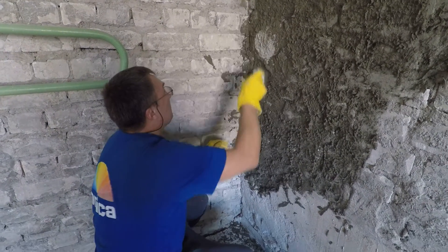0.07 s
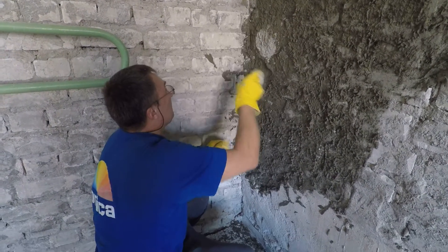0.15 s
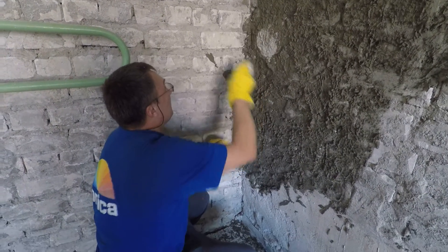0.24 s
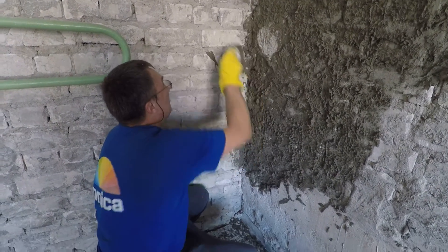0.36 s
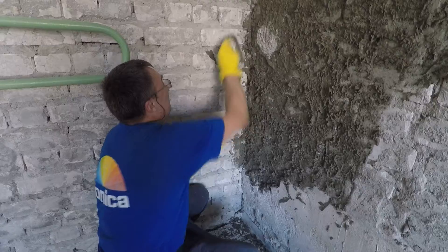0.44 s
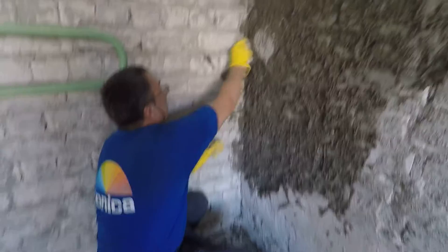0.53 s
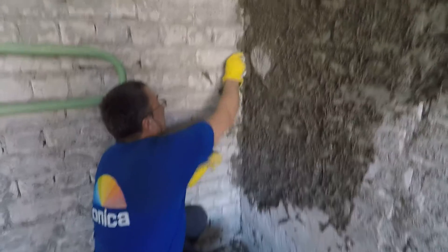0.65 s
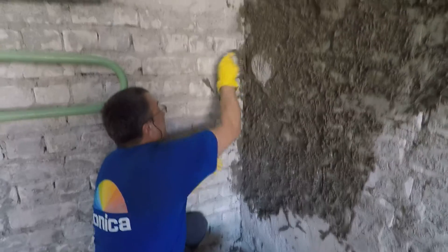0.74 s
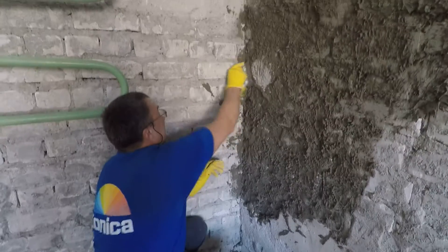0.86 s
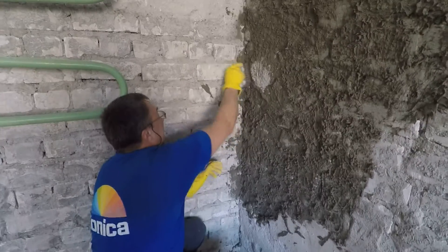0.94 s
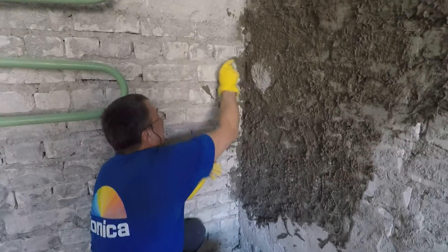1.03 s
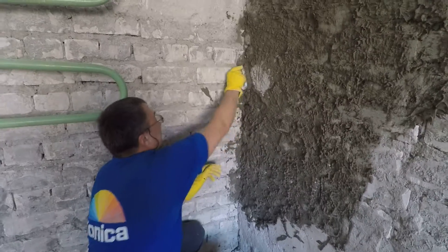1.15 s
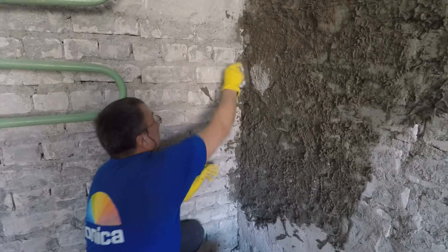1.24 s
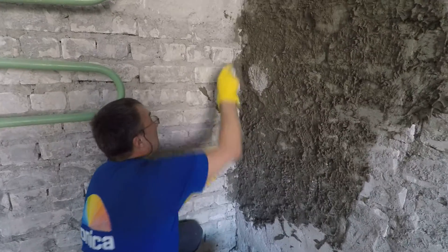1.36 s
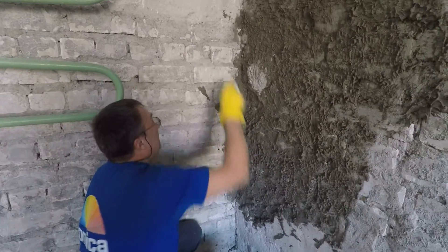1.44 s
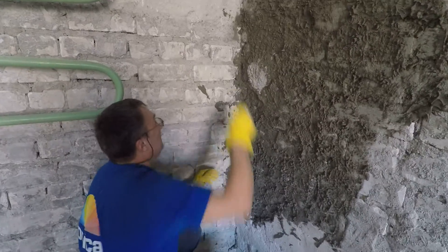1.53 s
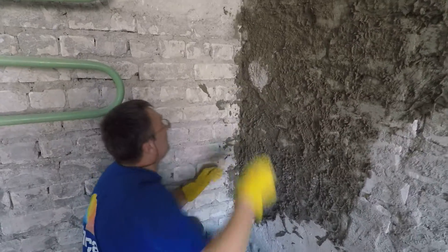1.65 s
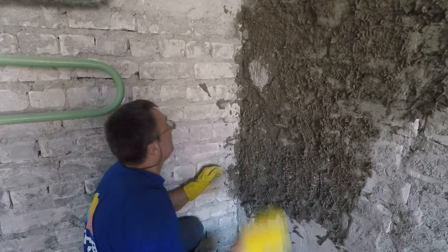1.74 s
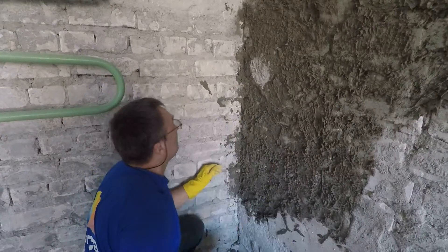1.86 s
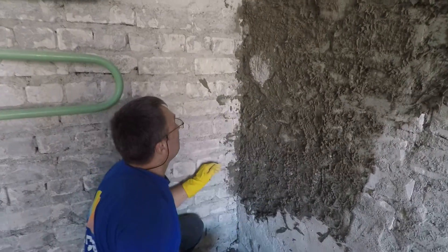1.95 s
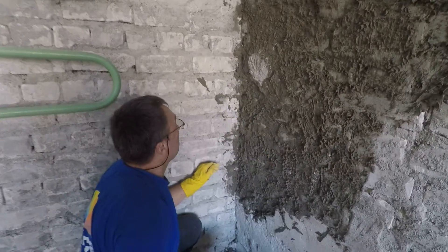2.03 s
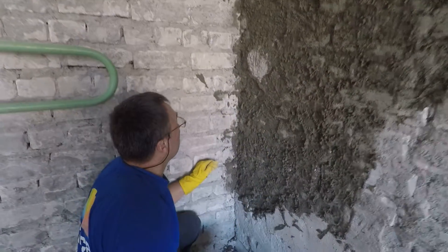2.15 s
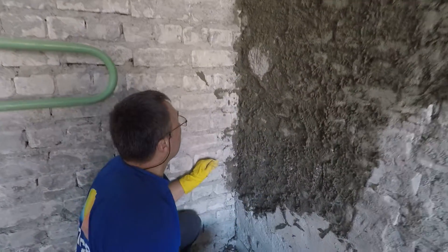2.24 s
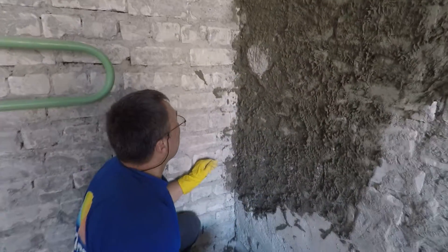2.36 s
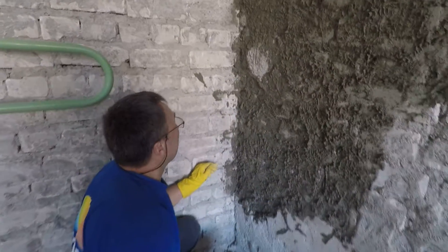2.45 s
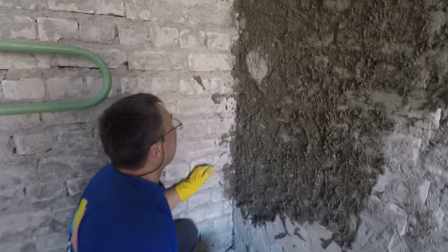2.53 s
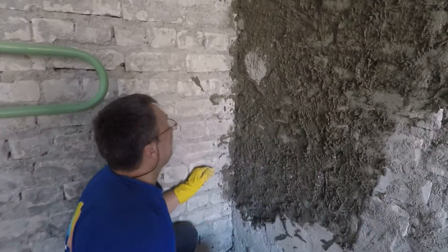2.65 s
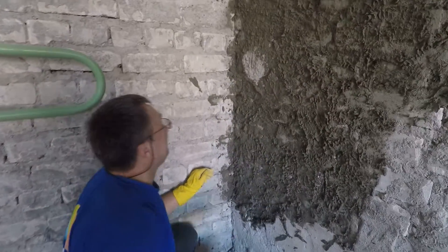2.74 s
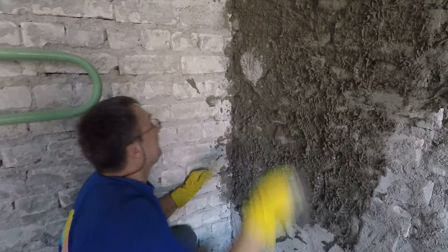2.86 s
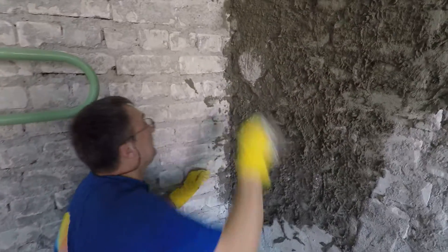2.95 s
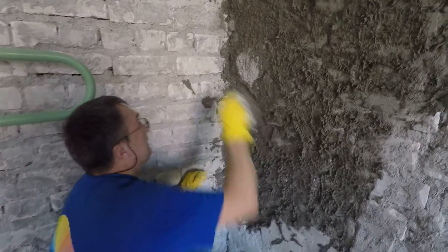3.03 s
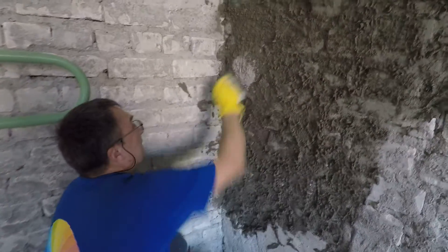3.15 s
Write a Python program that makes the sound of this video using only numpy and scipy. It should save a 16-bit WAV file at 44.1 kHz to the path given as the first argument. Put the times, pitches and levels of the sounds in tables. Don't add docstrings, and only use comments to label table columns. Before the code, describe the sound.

Three wet cement slaps on brick, the last hardest, echoing indoors over low mic rumble

```python
import sys
import numpy as np
from scipy import signal
from scipy.io import wavfile
from scipy.ndimage import uniform_filter1d

SR = 44100
rng = np.random.default_rng(int(sys.argv[2]) if len(sys.argv) > 2 else 0)


def makeup_ratio(level_db):
    decades = np.asarray(level_db, float) / 20
    return 10 ** decades


def log_audio(samples):
    frames = np.atleast_2d(samples).T
    limited = np.clip(frames, -1, 1)
    pcm = np.round(limited * 32767).astype(np.int16)
    wavfile.write(sys.argv[1], SR, pcm)


N = 141120
DIRECTIONS = 7


def evened(x):
    return x / np.sqrt(np.mean(x ** 2) + 1e-20)


def read(points, hz):
    f, value = np.transpose(points)
    return np.interp(np.log(hz + 1), np.log(f + 1), value)


def causal(points, size=2048):
    hz = abs(np.fft.fftfreq(size, 1 / SR))
    log_gain = np.log(makeup_ratio(read(points, hz)))
    spectrum = np.exp(np.conj(signal.hilbert(log_gain)))
    taps = np.fft.ifft(spectrum).real[:size // 2]
    return taps / np.linalg.norm(taps)


def resonate(x, hz, width_hz):
    return signal.lfilter(*signal.iirpeak(hz, hz / width_hz, SR), x)


def noise(points, size, patchy_db):
    top_hz = 15320
    frames, hz = 4 * N // size + 5, np.fft.rfftfreq(size, 1 / SR)
    a, b, patches = rng.standard_normal((frames, len(hz), 3)).T
    patches = uniform_filter1d(patches, size=10, axis=0)
    patches = evened(uniform_filter1d(patches, size=8, axis=1))
    gain = makeup_ratio(read(points, hz)[:, None] + patchy_db * patches)
    inside = (hz > points[0][0]) & (hz < top_hz)
    z = (a + 1j * b) * gain * inside[:, None]
    return evened(signal.istft(z, nperseg=size, noverlap=3 * size // 4)[1][:N])


def add(mix, s, sound):
    mix[:, round(s * SR):][:, :sound.shape[-1]] += sound


def rumble():
    # pitch in Hz, level in dB per Hz.
    air_colour = [(7.1, -19), (12, 5), (27, 10), (44, 3.5), (68, -4), (145, -29.5), (400, -36), (520, -43),
                  (880, -120)]
    # time in seconds, level in dB.
    gusts = [(0, -55.5), (.4, -52), (.45, -54.5), (.55, -43.5), (.7, -42), (.84, -45.5), (1.05, -42),
             (1.15, -49.5), (1.27, -43), (1.4, -46.5), (1.5, -49), (1.7, -47), (1.95, -52), (2.1, -45.5),
             (2.35, -48.5), (2.45, -40), (2.6, -48.5), (3.2, -50.5)]
    # pitch in Hz, level in dB per Hz.
    flutter_colour = [(50, -11.5), (90, 2), (150, -9), (350, -21.5)]
    lump_s, lump_db = 0.036, 2
    calm_db, flutter_db, flutter_growth = -48, -66.5, 1.2

    s, db = np.transpose(gusts)
    width = round(lump_s * SR)
    lumps = uniform_filter1d(rng.standard_normal(N), width)
    lumps = evened(uniform_filter1d(lumps, width))
    level_db = np.interp(np.arange(N) / SR, s, db) + lump_db * lumps
    flutter = noise(flutter_colour + [(2000, -96)], size=2048, patchy_db=-0.5)
    flutter = makeup_ratio(flutter_db + flutter_growth * (level_db - calm_db)) * flutter
    return makeup_ratio(level_db) * noise(air_colour, size=4096, patchy_db=1.5) + flutter


def hiss():
    # pitch in Hz, level in dB per Hz.
    hiss_colour = [(88, -28), (150, -7), (352, -7.5), (428, -8), (471, -10.5), (1130, -12.5), (1600, -14.5),
                   (5540, -19.5), (15500, -24)]
    return makeup_ratio(-66.5) * noise(hiss_colour, size=1024, patchy_db=1.1)


def room_tone():
    # pitch in Hz, level in dB per Hz.
    tone_colour = [(300, -6), (1200, -6.5), (2600, -2), (4500, -4.5), (7000, -17.5), (12000, -27)]
    return makeup_ratio(-70.5) * noise(tone_colour, size=1024, patchy_db=1.8)


def smack(start, strength_db, length, palm_db, bright_db):
    # pitch in Hz, level in dB.
    wet_colour = [(200, -36.5), (900, -15), (1400, -6.5), (2200, -6), (3000, -0.5), (4600, -12),
                  (8300, -26.5), (15000, -35)]
    clicks_per_s, click_spread_db = 5000, 1.5
    rise_s, rise_share = 0.00063, 0.42
    palm_hz, palm_width_hz = 1730, 594
    pivot_hz = 3000

    t = np.arange(4096) / SR
    hit, size, sign = rng.random((3, DIRECTIONS, len(t)))
    rise = np.minimum(t / (rise_s + rise_share * length), 1) ** 2
    shape = rise * np.exp(-t / max(length, 5e-4))
    happens = hit < clicks_per_s / SR
    loudness = makeup_ratio(-click_spread_db * np.log(size + 0.012))
    clicks = shape * happens * loudness * np.sign(sign - 0.5)
    clicks = clicks * np.linalg.norm(shape) / (np.linalg.norm(clicks, axis=1, keepdims=True) + 1e-9)
    colour = causal([(hz, db + bright_db * np.log2(hz / pivot_hz)) for hz, db in wet_colour])
    wet = signal.fftconvolve(clicks, colour[None], axes=1)[:, :len(t)]
    palm = resonate(resonate(wet, palm_hz, palm_width_hz), palm_hz, palm_width_hz)
    return start, makeup_ratio(strength_db) * (wet + makeup_ratio(palm_db) * palm)


def room(x):
    # pitch in Hz, time to fall by 60 dB in seconds.
    ring_times = [(150, .9), (300, 0.94), (1040, 0.97), (1700, 0.79), (2760, 0.75), (5000, 0.54),
                  (7500, 0.54), (13000, 0.6)]
    gap_s, early_db, early_s = 0.0012, 7, 0.028

    echoes = np.zeros((len(x), SR))
    at = np.arange(0, SR - 20, 20) + rng.integers(0, 20, (len(x), SR // 20 - 1))
    np.put_along_axis(echoes, at, rng.choice([-1., 1.], at.shape), 1)
    hz, t, z = signal.stft(echoes, SR, nperseg=128)
    ring_s = np.maximum(read(ring_times, hz), 0.05)
    fading = makeup_ratio(-60 * t / ring_s[:, None])
    tail = signal.istft(z * fading, SR, nperseg=128)[1][:, :SR]
    t = np.arange(SR) / SR
    tail = tail * np.clip(t / gap_s - 1, 0, 1) * makeup_ratio(early_db * np.exp(-t / early_s))
    tail = tail / np.linalg.norm(tail)
    return makeup_ratio(5.5) * signal.fftconvolve(x, tail, axes=1)[:, :N].sum(0)


def cavity(air):
    # pitch in Hz, width in Hz, level of its added ringing in dB.
    resonances = [(1720, 460, -10), (2505, 440, -5), (3360, 630, -2), (4070, 530, -4), (5670, 660, 3.5),
                  (6420, 480, 4), (7570, 690, 6), (9300, 590, -2)]
    ringing = sum(makeup_ratio(db) * resonate(air, hz, width_hz) for hz, width_hz, db in resonances)
    return makeup_ratio(-2.5) * (air + ringing)


def bump(start, strength_db, hz, length):
    t = np.arange(round(length * SR)) / SR
    swings = np.sin(-2 * np.pi * hz * t * (1.2 - 0.27 * t / length))
    return start, makeup_ratio(strength_db) * np.hanning(len(t))[None] * swings


def push(start, strength_db, hz, width_hz):
    blow = np.zeros(4096)
    blow[round(0.001 * SR)] = 20
    return start, makeup_ratio(strength_db) * resonate(resonate(blow, hz, width_hz), hz, width_hz)


def scene():
    # start in seconds, strength in dB, squelch length in seconds,
    # cupped-palm level in dB, brightness in dB per octave.
    smacks = [
        (0.5696, -28, 0.0039, 3, -1),
        (0.8837, -28, 0.0028, 0.5, -1),
        (1.142, -21.5, 0.0014, -7.5, -1.5),
    ]
    touches = [(0.144, -59, 0.0094, -21, 1), (0.278, -56, 0.0027, -18, -0.5),
               (0.493, -67.5, 0.041, -3, -4.5), (1.13, -49, 0.0067, 0, 3), (2.2374, -47.5, 0.00081, -10, 7),
               (2.2448, -43.5, 0.0023, 0, -1), (2.249, -51, 0.0013, 8, -3), (2.487, -74, 0.018, 18, 0),
               (2.659, -59, 0.015, -11, 7), (2.675, -54.5, 0.016, -7, 0.5), (2.188, -68.5, 0.038, -4, -4),
               (2.61, -69.5, 0.053, -9, -1.5)]
    # start in seconds, strength in dB, pitch in Hz, width in Hz.
    pushes = [(.571, -33, 560, 313), (.572, -25.5, 140, 104), (0.57, -33, 977, 294), (.885, -30, 402, 150),
              (.886, -29, 830, 209), (1.143, -22.5, 174, 117), (1.143, -25.5, 254, 90),
              (1.143, -30.5, 414, 195), (1.143, -34, 730, 397), (2.247, -45, 610, 196),
              (2.248, -49, 1200, 302)]
    cracks = [
        (0.572, -34, 0.0022, -12, 6),
        (0.887, -30.5, .001, -10, 4.5),
        (1.143, -21.5, 0.0015, -10, 0),
        (2.247, -40, 0.0011, -23, 5),
        (2.688, -51, .003, -10, 5),
        (2.2492, -46.5, 0.0031, 12.5, -3),
    ]
    # start in seconds, strength in dB, pitch in Hz, length in seconds.
    puffs = [(.53, -41, 40, .04), (0.58, -31, 59.5, 0.044), (.6, -44.5, 113, 0.034),
             (1.326, -44, 99, 0.023), (1.701, -53, 78.4, 0.037), (2.041, -51, 118, 0.026),
             (2.076, -40.5, 64, 0.034), (2.367, -37, 49, 0.053), (.565, -40, 122, 0.022)]

    hand, straight = np.zeros((2, DIRECTIONS, N))
    capsule = (rumble() + hiss())[None]
    for row in smacks + touches:
        add(hand, *smack(*row))
    for row in pushes:
        add(hand, *push(*row))
    for row in cracks:
        add(straight, *smack(*row))
    for row in puffs:
        add(capsule, *bump(*row))
    air = hand[0] + straight[0] + room(hand[1:]) + room_tone()
    return cavity(air) + capsule


def roll_off(x):
    return signal.sosfilt(signal.butter(12, 16060, fs=SR, output="sos"), x)


def record(dry):
    low_pass = signal.butter(10, 15200, fs=SR, output="sos")
    return roll_off(signal.sosfilt(low_pass, dry))


dry = scene()
out = record(dry)
log_audio(out)
```